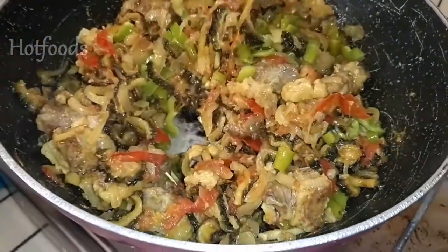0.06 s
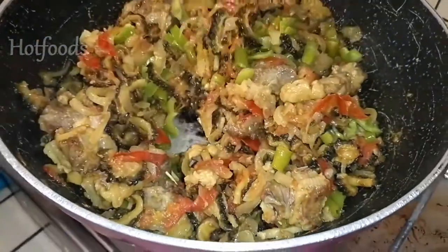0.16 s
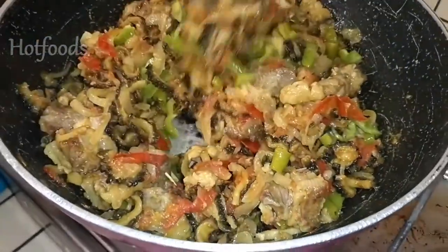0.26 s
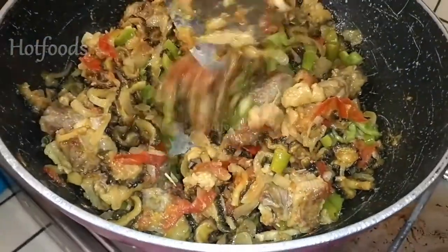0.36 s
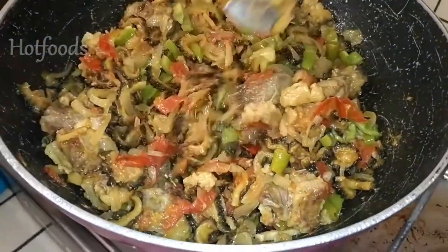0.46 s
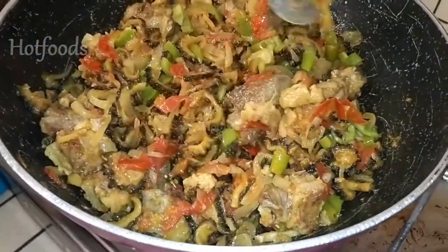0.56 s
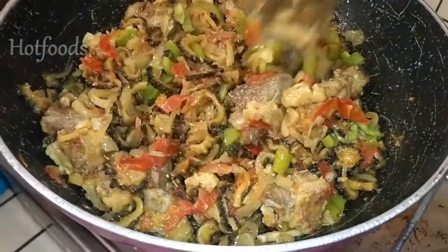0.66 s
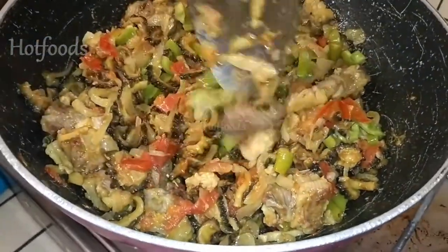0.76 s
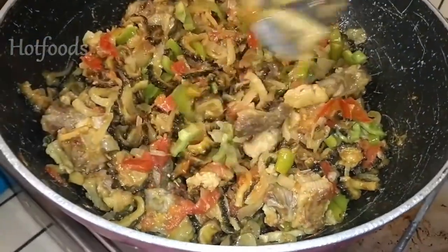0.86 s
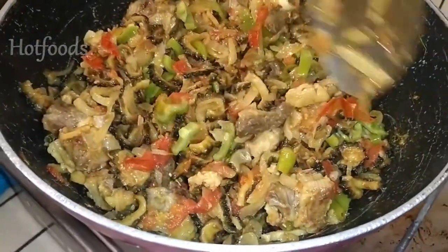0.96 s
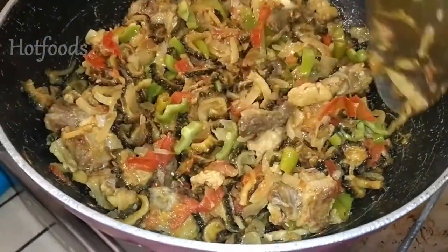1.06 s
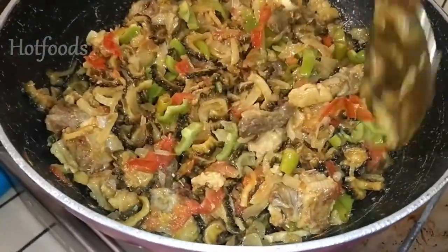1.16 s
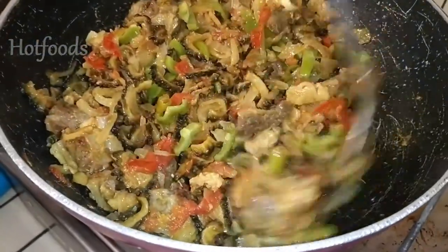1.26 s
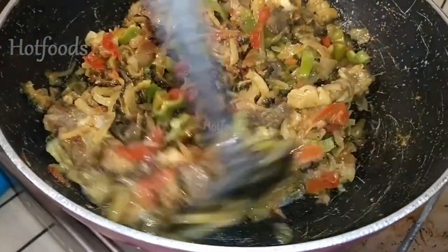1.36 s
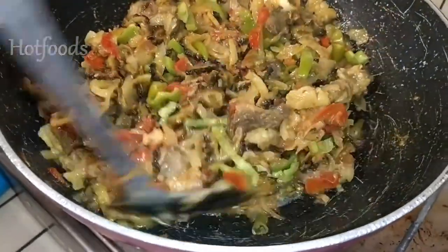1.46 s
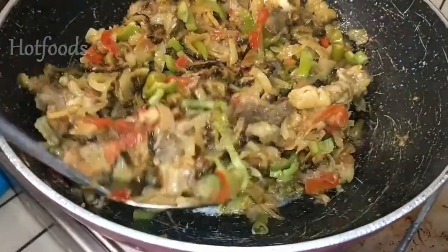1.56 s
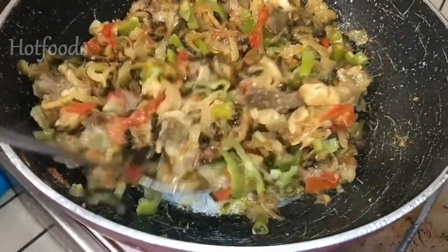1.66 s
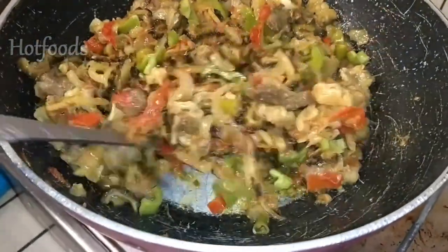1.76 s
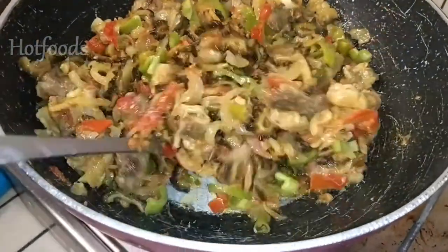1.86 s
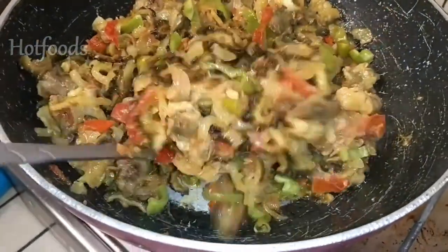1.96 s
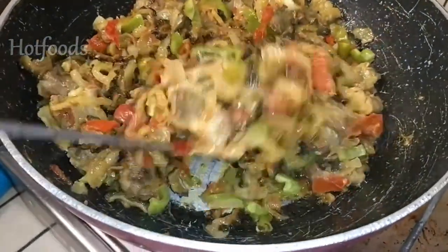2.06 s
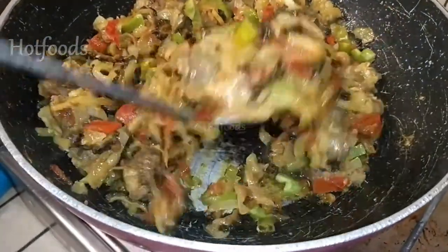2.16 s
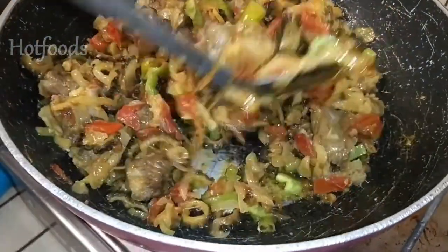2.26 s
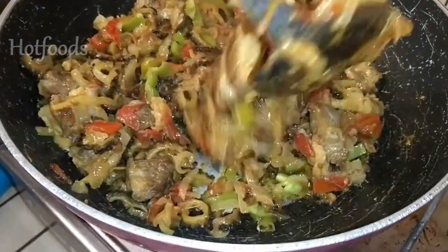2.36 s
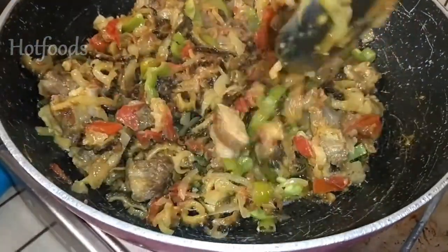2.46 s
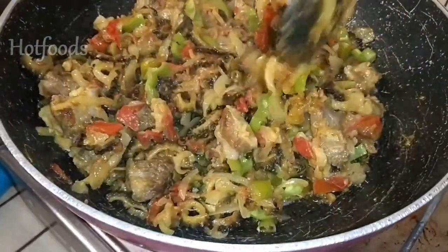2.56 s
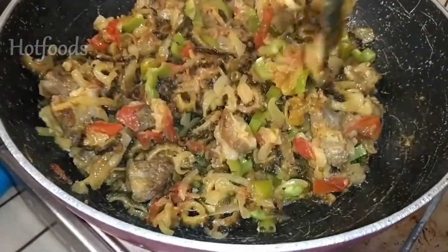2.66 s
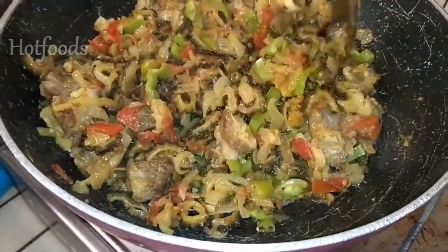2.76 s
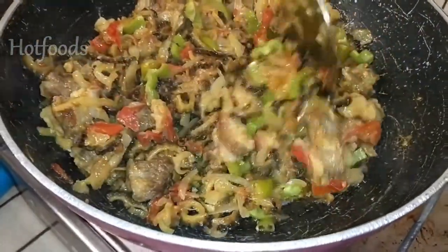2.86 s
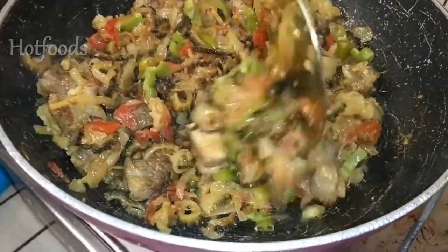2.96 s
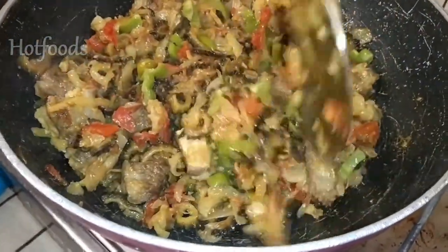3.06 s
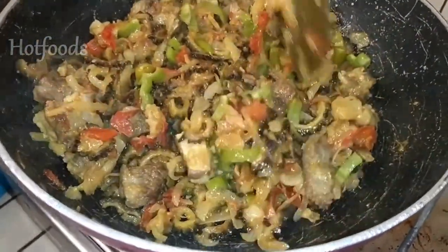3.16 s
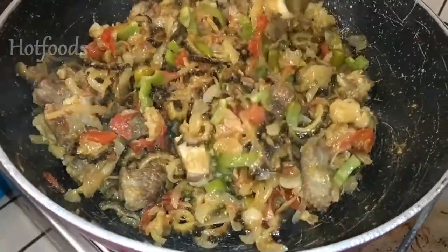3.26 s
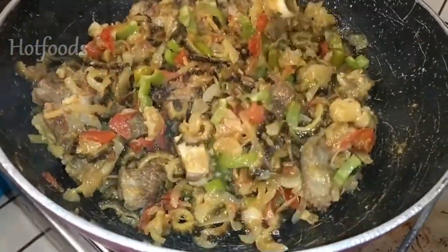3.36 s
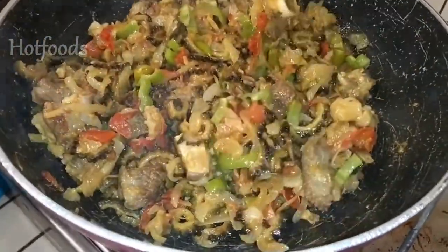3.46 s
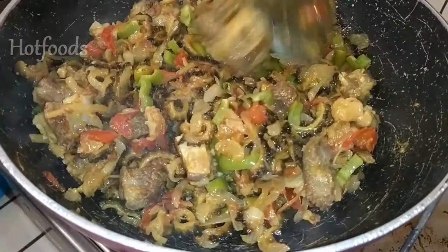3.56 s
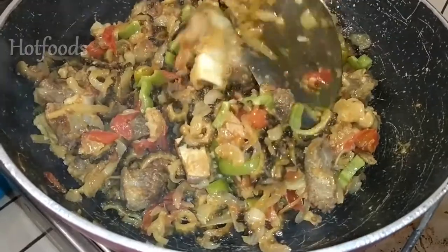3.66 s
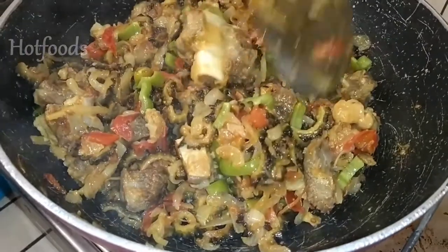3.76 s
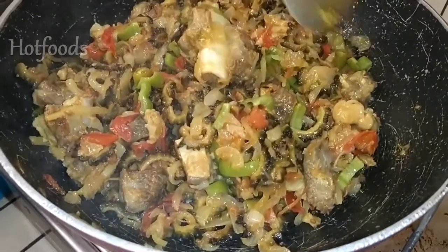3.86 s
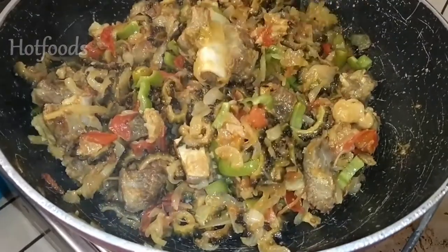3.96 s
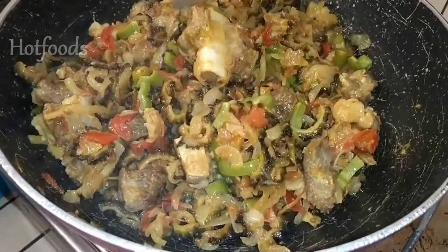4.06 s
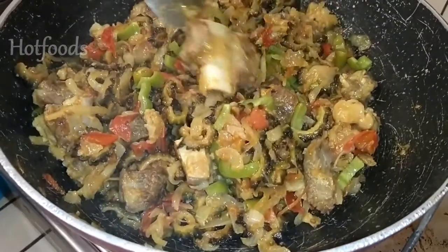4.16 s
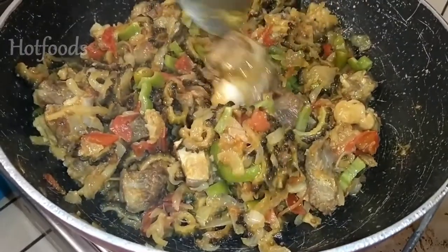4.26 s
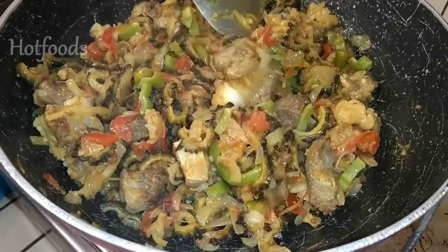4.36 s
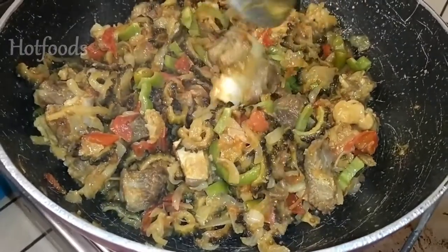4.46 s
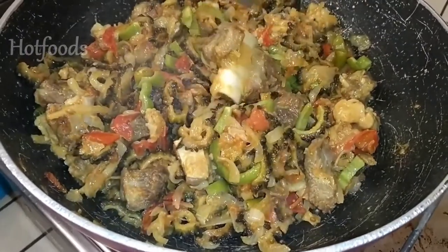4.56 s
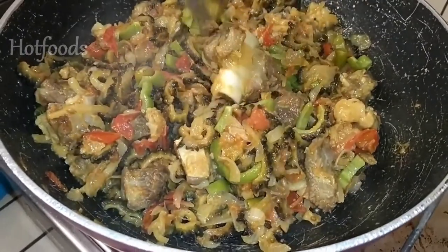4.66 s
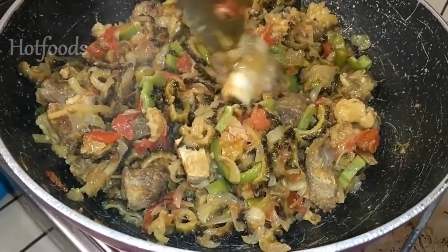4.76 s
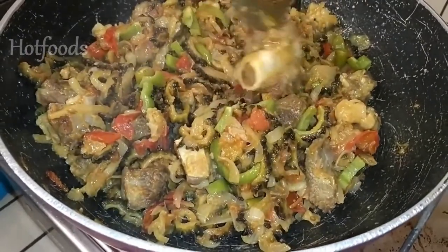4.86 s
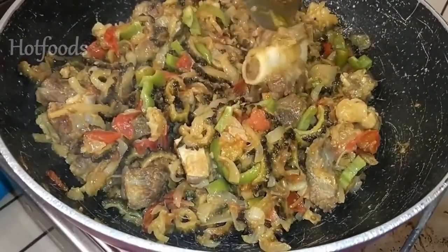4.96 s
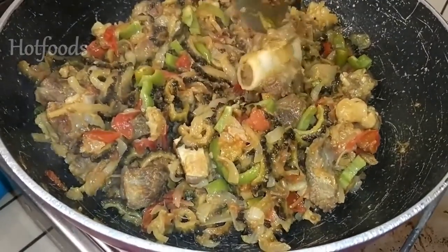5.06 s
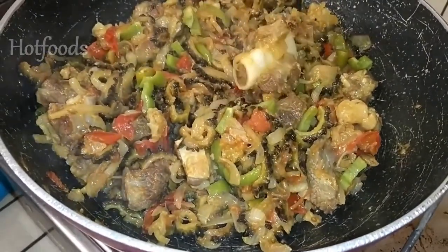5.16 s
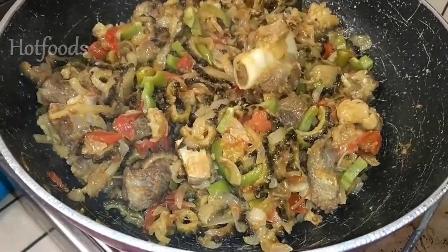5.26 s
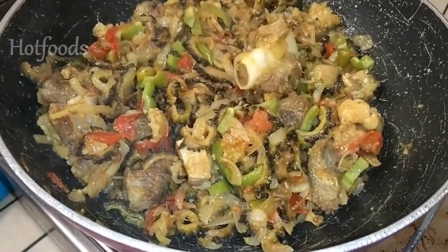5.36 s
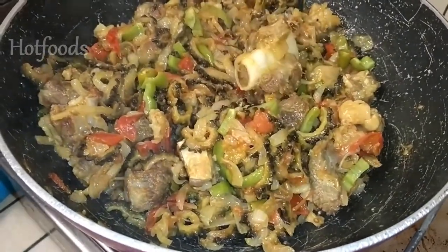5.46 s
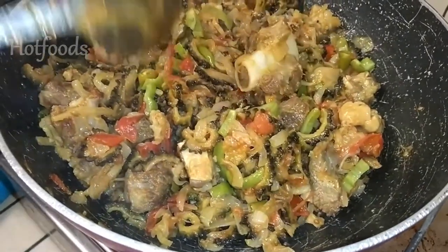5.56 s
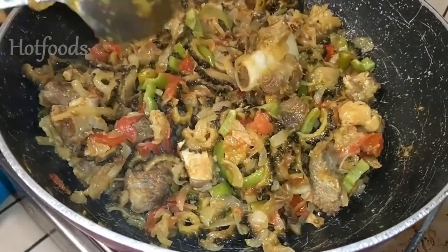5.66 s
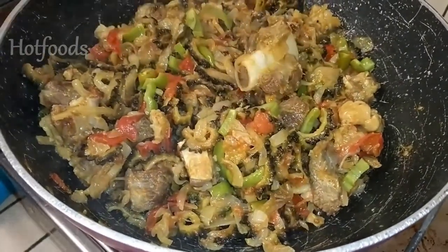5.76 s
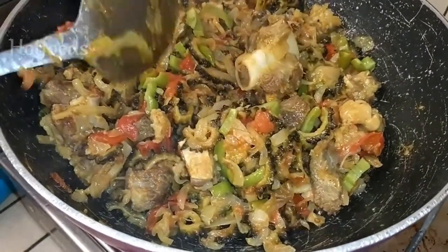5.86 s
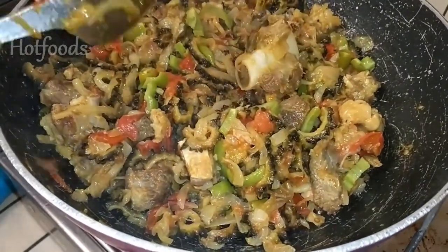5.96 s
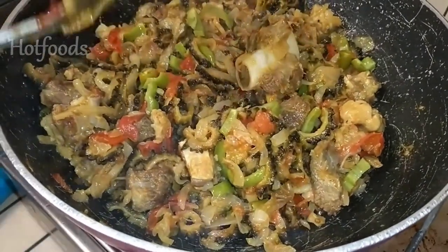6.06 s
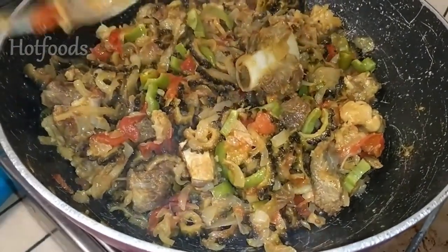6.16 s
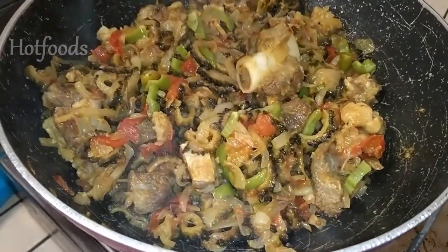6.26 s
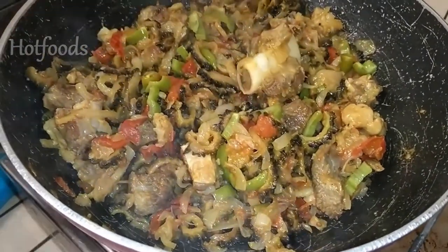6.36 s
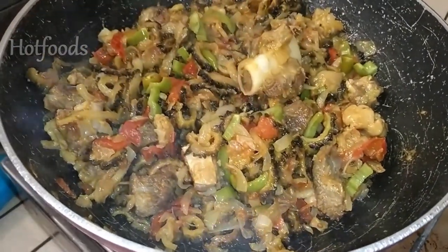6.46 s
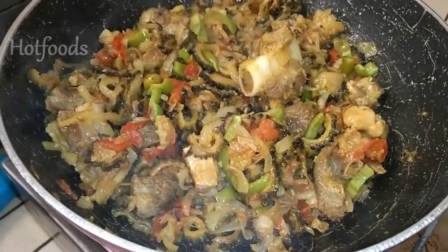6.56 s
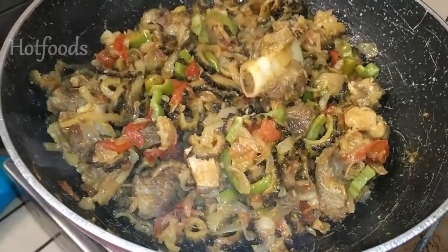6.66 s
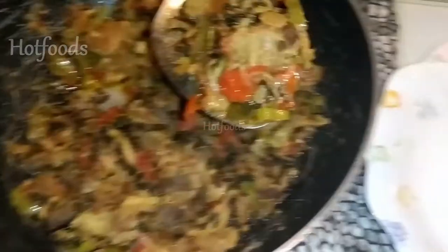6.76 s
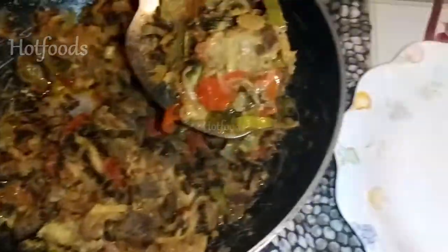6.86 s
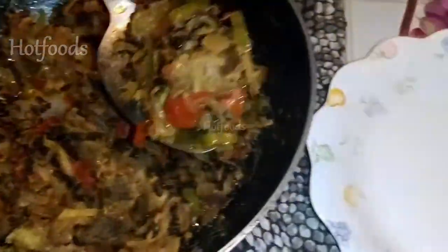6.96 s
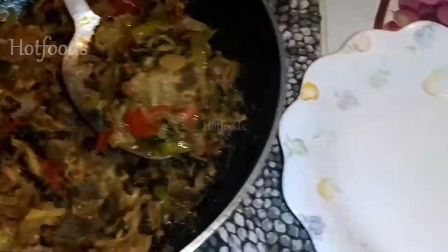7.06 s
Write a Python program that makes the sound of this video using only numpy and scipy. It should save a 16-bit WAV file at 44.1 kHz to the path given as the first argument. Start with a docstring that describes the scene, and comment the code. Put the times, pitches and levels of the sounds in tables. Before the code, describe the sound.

Close, wide stereo frying in a hard-walled kitchen: dense bright sizzle with oil spits over low rumble and faint fan hum. Early on, a steel spoon knocks and scrapes the wok in quick strokes. Midway a metal lid clanks and rattles sharply. Later something heavy is shoved far off, dull and brief. The hiss slowly eases, then cuts suddenly to a quiet room with a tiny final tap.

```python
"""Frying in a wok, then a quiet table

Vegetables hiss, crackle and spit in a wok close to two spaced microphones: noise shaped by frequency and tiny bursts.
A steel spoon scrapes and knocks the wok: rough grains and single blows set its ringing tones going.
A metal lid clanks and rattles as decaying tones with cracks; a heavy shove far off is a swell of dull noise.
A fan hums as a wandering tone, and hard walls echo the blows. Near the end the sound cuts to the table,
with soft room noise, faint appliance tones and a last small knock of the spoon."""
import sys
import numpy as np
from scipy import signal
from scipy.fft import rfft, irfft, next_fast_len
from scipy.io import wavfile
from scipy.ndimage import uniform_filter1d, map_coordinates

SR = 44100
rng = np.random.default_rng(int(sys.argv[2]) if len(sys.argv) > 2 else 0)


def transcribe(u):
    """Save the signal u as a 16-bit wav file named by the first command-line argument.

    u: samples, shape (n,) or (channels, n), limited to [-1, 1]; the rate is SR.
    q: integer samples, one column per channel.
    """
    v = np.clip(np.atleast_2d(u).T, -1, 1)
    q = np.round(v * 32767).astype(np.int16)
    wavfile.write(sys.argv[1], SR, q)


def volts(x):
    """Linear amplitude factor 10**(x/20) for a level x in dB, scalar or array-like."""
    e = np.asarray(x, float) / 20
    return 10 ** e


N = 313992  # length in samples
CUT_S = 6.772  # the stove gives way to the table

# Colours of noise, only their shape counts: (frequency [Hz], relative level [dB])
SIZZLE_COLOUR = [(210, -37.5), (350, -11.5), (600, -18), (750, -10.5), (1300, -11), (1900, -9),
                 (3050, -6.5), (3500, -8), (4500, -5.5), (4900, -9), (6300, -4.5), (7000, -4), (8000, 1.5),
                 (9500, -4.5), (11900, -13), (12200, -16.5), (14000, -21.5), (15700, -19.5)]
RUMBLE_COLOUR = [(13, -37), (22, -11.5), (151, 0.5), (214, -1.5), (233, -4), (335, -4), (416, -16.5),
                 (480, -10), (700, -9.5), (910, -25.5), (1540, -120)]
RASP_COLOUR = [(880, -41.5), (1500, -17), (1850, -16), (2100, -16), (2300, -14.5), (4640, -9.5), (6120, -9),
               (8320, -2), (14600, -23.5), (16000, -30.5)]
CRACK_COLOUR = [(22, -45), (55, -28), (100, -21), (249, -16), (442, -28), (691, -17), (1250, -29.5),
                (1610, -20.5), (2470, -20.5), (2860, -23), (3540, -13.5), (6700, -13.5), (7770, -1),
                (16000, -26)]
SHOVE_COLOUR = [(29, -51), (50, -22), (118, -4), (222, -0.5), (353, -7), (543, -19), (634, -36), (700, -28),
                (910, -54), (1540, -120)]
TABLE_COLOUR = [(15, -40), (45, -13), (110, -18.5), (175, -13), (300, -18), (450, -26), (1100, -30.5),
                (1500, -31), (3000, -34.5), (4200, -36), (5800, -34), (10000, -40), (12000, -42),
                (12350, -51), (12450, -100)]
# How alike left and right are: (frequency [Hz], likeness [1 = same, 0 = unrelated])
ALIKE = [(60, 0.68), (180, 0.86), (550, 0.64), (1650, 0.0052), (4970, 0.023), (15000, -0.046)]
# How the two microphones differ: (frequency [Hz], left minus right [dB])
MIC_DIFFERENCE = [(60, 1), (130, -1.5), (290, -1), (640, -1.5), (1410, 2), (3100, 2), (6820, -4.5),
                  (15000, -3)]
# How long the kitchen echo takes to fall by 60 dB: (frequency [Hz], time [s])
KITCHEN_DECAY = [(150, 0.53), (600, 0.53), (3000, 0.66), (8000, 0.5), (14000, 0.45)]
# Hum of the fan: (frequency [Hz], level [dB])
FAN_TONES = [(209.9, -68)]
# Appliance tones at the table: (frequency [Hz], level [dB])
TABLE_TONES = [(244, -64.5), (1516, -80)]
# Average course of the low rumble: (time [s], level [dB])
RUMBLE_LEVEL = [(0.0, -61.5), (0.41, -57.5), (0.8, -61.5), (1.7, -56.5), (3.1, -60), (5.2, -59),
                (5.6, -57.5), (6.7, -59)]
# The lid lands and lands again: (time [s], strength [dB], ring tilt [dB per octave])
LANDINGS = [(3.6535, -6, -7), (3.673, -14, -2), (3.683, -18, -5)]
# Ringing tones of the lid: (frequency [Hz], level [dB], time to fall by 60 dB [s])
LID_MODES = [(3058, -22, .12), (3500, -17, .5), (3822, -18, .12), (4609, -14, .12), (5974, -14, .2),
             (6487, -16, .15), (7000, -14, .12), (7606, -6, .25), (7804, -7, .15), (7958, -5, .3),
             (8343, -6, .2), (8406, -7, .2), (8499, -4, .25), (9346, -6, .2), (9679, 0, .13),
             (10290, -9, .2), (11320, -17, .15), (11838, -15, .15)]
# Ringing tones of the wok: (frequency [Hz], width [Hz], level [dB])
WOK_MODES = [(210, 23, -12), (387, 23, -6), (479, 18, 1.5), (707, 77, 0.5), (792, 66, 2), (970, 190, -6),
             (1149, 42, 6), (1465, 99, 1), (1610, 150, -5.5), (2074, 77, -5)]
# Ringing tones of the spoon bowl: (frequency [Hz], width [Hz], level [dB])
BOWL_MODES = [(2800, 250, 0), (3550, 300, 0), (4050, 300, -2), (4660, 250, -3)]
# Spoon pushed over the wok:
# (time of most pressure [s], build-up [s], rasp [dB], wok ring [dB], spoon ring [dB])
PUSHES = [(1.295, 0.045, -41.5, -47, -47), (1.425, 0.078, -29.5, -41.5, -63),
          (1.575, 0.035, -39.5, -46.5, -41.5), (1.705, 0.049, -32.5, -44.5, -68),
          (1.795, .07, -34, -40, -41), (1.862, .05, -38.5, -34, -42)]
# Spoon knocks: (time [s], click strength [dB], blow strength [dB], hardness [dB per octave])
KNOCKS = [(1.279, -19, 4.5, -7.5), (1.415, -43, -0.5, -5), (1.5628, -33.5, -5.5, -11.5),
          (1.7024, -29.5, 2.5, -4.5), (1.7374, -39, 4, -5), (1.8497, -34, -6, 4), (6.9092, -73, -23, -2.1)]
# Wet food meets hot metal: (time [s], rise [dB], settling time [s])
FLARES = [(0.0, 2.5, .35), (1.7, 2, .4), (3.9, 1, 1.0)]
# Loudest oil spits: (time [s], strength [dB])
LOUD_SPITS = [(0.034, -34.5), (0.1, -35.5), (0.117, -39.5), (0.137, -40.5), (0.2194, -40.5), (0.449, -39),
              (0.8896, -34.5), (0.9794, -38.5), (1.105, -39), (1.2585, -36), (4.0492, -43), (4.3994, -41),
              (6.0694, -40), (6.2692, -40)]


def unit(x):
    """Scales a sound to an average (rms) level of 1."""
    return x / np.sqrt(np.mean(x ** 2) + 1e-20)


def along(points, hz):
    """Reads a value between (frequency, value) points, on a log frequency axis."""
    f, value = np.transpose(points)
    return np.interp(np.log(hz + 1), np.log(f + 1), value)


def curves(rows):
    """Gives one value per sample for each column after the time."""
    s, *columns = np.transpose(rows)
    return [np.interp(np.arange(N) / SR, s, column) for column in columns]


def wobble(rate):
    """Draws a smooth random curve through `rate` random points a second."""
    points = rng.standard_normal(int(N * rate / SR) + 4)
    return map_coordinates(points, [np.arange(N) * rate / SR])


def filtered(x, response):
    """Multiplies each frequency of x by response(frequency)."""
    m = next_fast_len(N + SR // 2)
    return irfft(rfft(x, m) * response(np.fft.rfftfreq(m, 1 / SR)), m)[..., :N]


def coloured(x, colour):
    """Gives x this colour with a filter of energy 1 that never acts ahead of time."""
    gain = volts(along(colour, np.fft.rfftfreq(4096, 1 / SR)))
    cepstrum = irfft(np.log(gain + 1e-6))
    cepstrum[1:2048] *= 2  # folded forward, so a burst keeps its sharp start
    kernel = irfft(np.exp(rfft(cepstrum[:2049], 4096)))
    return signal.fftconvolve(x, kernel[None] / np.linalg.norm(kernel), axes=1)[:, :N]


def diffuse(colour, patchy_db):
    """Makes wide stereo noise of rms 1, alike in the bass, with random louder and softer patches."""
    z = signal.stft(rng.standard_normal((2, N)), nperseg=512)[2]
    patches = uniform_filter1d(rng.standard_normal(z.shape[1:]), 6, 0)
    patches = unit(uniform_filter1d(patches, 10, 1))
    pair = signal.istft(z * volts(patchy_db * patches), nperseg=512)[1][:, :N]

    def middle_and_side(hz):
        angle = np.arccos(np.clip(along(ALIKE, hz), -1, 1)) / 2
        return volts(along(colour, hz)) * np.array([np.cos(angle), np.sin(angle)])

    mid, side = filtered(pair, middle_and_side)
    return unit(np.array([mid + side, mid - side]))


def bursts(seconds, db, life):
    """Makes an envelope of sudden bursts, each fading to about a third in `life` seconds."""
    starts = np.bincount((np.asarray(seconds) * SR).astype(int), volts(db), N)[:N]
    return signal.lfilter([1], [1, -np.exp(-1 / (max(life, 1e-4) * SR))], starts)


def grains(count, spread_db, life):
    """Makes stereo noise from tiny random bursts, many small and few large."""
    when, chance = rng.random((count, 2)).T
    size_db = -spread_db * np.log(.02 + chance)
    return bursts(when * N / SR, size_db, life) * rng.standard_normal((2, N))


def tones(lines, waver_db, drift):
    """Adds steady tones whose level and phase (drift in radians) wander."""
    t = np.arange(N) / SR
    total = 0
    for hz, db in lines:
        level = volts(db + 1.5 + waver_db * wobble(6.6))
        total = total + level * np.sin(2 * np.pi * hz * t + drift * wobble(12))
    return total


def resonate(force, modes):
    """Lets a force ring a body with damped modes; neighbouring modes alternate in sign."""
    def body(hz):
        total = 0
        for k, (centre, width, db) in enumerate(modes):
            damping = 1j * hz * width
            total = total + (-1) ** k * volts(db) * damping / (centre ** 2 - hz ** 2 + damping)
        return total

    return filtered(force, body)


def kitchen(x):
    """Hard walls answer after about 6 ms with dense echoes; each frequency dies at its own speed."""
    hz, t, z = signal.stft(rng.standard_normal((2, SR * 3 // 4)), SR, nperseg=256)
    t60 = np.maximum(along(KITCHEN_DECAY, hz), .05)[:, None]
    tail = signal.istft(z * volts(-60 * t / t60), SR, nperseg=256)[1]
    late = np.pad(x, ((0, 0), (260, 0)))
    return signal.fftconvolve(late, tail / np.linalg.norm(tail[0]), axes=1)[:, :N]


def table():
    """A quiet room: soft shaped noise that wavers a little, and faint appliance tones."""
    air = volts(-64 + 0.62 * wobble(11)) * diffuse(TABLE_COLOUR, patchy_db=1.5)
    return air + tones(TABLE_TONES, waver_db=2.5, drift=0.14)


def fan():
    """The fan hums: a low tone with wandering level and phase."""
    return tones(FAN_TONES, waver_db=2.0, drift=0.42)


def rumble():
    """A low rumble swells and sinks: noise with most of its strength in the bass."""
    level_db = curves(RUMBLE_LEVEL)[0] + 0.69 * wobble(7)
    return volts(level_db) * diffuse(RUMBLE_COLOUR, patchy_db=1.26)


def shove():
    """Something heavy is shoved far off: dull noise, the same on both sides, rises, holds and dies."""
    start_s, rise_s, hold_s, t60_s, level_db = 5.358, .02, .09, .3, -49.5
    t = np.arange(N) / SR - start_s
    rise = np.clip(t / rise_s, 0, 1)
    loss_db = 60 * np.maximum(t - rise_s - hold_s, 0) / t60_s
    shape = rise * volts(level_db - loss_db)
    return coloured(shape * rng.standard_normal((1, N)), SHOVE_COLOUR)


def lid():
    """Each contact cracks and rings the lid's modes anew; the lid rocks, so every mode flutters."""
    rattle_s, gap_s, rattle_db = 3.659, .009, -17.5
    hold_s, loss_db_per_s = 0.025, 380.5  # the rattle holds its strength, then weakens fast
    ring_db = -14.5  # ring compared with contact strength
    out, t = np.zeros((2, N + SR)), np.arange(SR * 6 // 10) / SR
    hz, level, t60 = np.transpose(LID_MODES)[:, :, None, None]
    flutter_db = 3.5 * np.array([[wobble(60)[:len(t)]] for _ in LID_MODES])

    after = gap_s * (np.arange(7) + rng.uniform(0, .4, size=7))
    chatter_db = rattle_db - loss_db_per_s * np.maximum(after - hold_s, 0)
    contacts = LANDINGS + [(rattle_s + s, db, 1.5) for s, db in zip(after, chatter_db)]
    for s, db, tilt_db in contacts:
        chance_db, chance_phase = rng.standard_normal((2, len(LID_MODES), 2, 1))
        mode_db = level + tilt_db * np.log2(hz / 7000) + 1.5 * chance_db + flutter_db
        gain = volts(mode_db - 60 * t / t60)
        ring = np.sum(gain * np.sin(2 * np.pi * hz * t + 3 * chance_phase), axis=0)
        onset = 1 - np.exp(-t / .001)
        out[:, round(s * SR):][:, :len(t)] += volts(db + ring_db) * ring * onset

    s, db, _ = np.transpose(contacts)
    crack = uniform_filter1d(bursts(s, db, life=.0035), size=70, origin=34)  # a contact takes a moment to build
    return out[:, :N] + coloured(crack * rng.standard_normal((2, N)), CRACK_COLOUR)


def scrapes():
    """The spoon's edge catches on the rough coating in quick grains that rasp and ring both metals."""
    build_db, release_ratio, deep_db = 12.5, .75, -22  # pressure gain; release over build-up; deep ring under rasp
    t = np.arange(N) / SR
    catches = grains(count=20000, spread_db=2.0, life=.001)
    rasp = unit(coloured(catches, RASP_COLOUR))
    deep = unit(resonate(catches, [mode for mode in WOK_MODES if mode[0] <= 600]))
    high = unit(resonate(catches, [mode for mode in WOK_MODES if mode[0] > 600]))
    bowl = unit(resonate(catches, BOWL_MODES))
    out = 0
    for s, build, rasp_db, ring_db, bowl_db in PUSHES:
        distance = np.maximum((s - t) / build, (t - s) / (build * release_ratio))
        pressure = volts(-build_db * distance)
        rough = volts(rasp_db) * (rasp + volts(deep_db) * deep)
        out = out + pressure * (rough + volts(ring_db) * high + volts(bowl_db) * bowl)
    return out


def knocks():
    """The spoon strikes the wok: short noisy clicks, each with a blow that rings the metal."""
    s, db, _, _ = np.transpose(KNOCKS)
    clicks = uniform_filter1d(bursts(s, db, life=0.0095), size=30, origin=14)  # softens each start
    out = coloured(clicks * rng.standard_normal((2, N)), RASP_COLOUR)
    for s, _, blow_db, tilt_db in KNOCKS:
        # a soft blow favours low modes
        struck = [(hz, width, db + tilt_db * np.log2(hz / 700)) for hz, width, db in WOK_MODES]
        blow = np.arange(N) == round(s * SR)
        out = out + volts(blow_db) * resonate(blow, struck)
    return out


def sizzle():
    """Steam bubbles burst in the oil: a dense hiss with tiny pops, fading slowly as the food dries."""
    start_db, fade_db_per_s = -42, 0.2338  # before flares and wobble
    t = np.arange(N) / SR
    level_db = start_db - fade_db_per_s * t
    for s, rise_db, settle in FLARES:
        level_db = level_db + rise_db * (t >= s) * np.exp(-abs(t - s) / settle)
    crackle = unit(coloured(grains(count=9000, spread_db=3.5, life=0.00043), SIZZLE_COLOUR))
    hiss = unit(diffuse(SIZZLE_COLOUR, patchy_db=1.43) + volts(-7.5) * crackle)
    return volts(level_db + 0.53 * wobble(7.8) + 0.47 * wobble(30)) * hiss


def spits():
    """Oil spits: loud ones at set times and weak ones at random, each a brief burst of noise."""
    weakest_db = -48.5
    small = [(CUT_S * when, weakest_db + 5 * size) for when, size in rng.random(size=(24, 2))]
    s, db = np.transpose(LOUD_SPITS + small)
    return coloured(bursts(s, db, life=0.0068) * rng.standard_normal((2, N)), SIZZLE_COLOUR)


def scene():
    """The stove up to the cut, then the table; the spoon is heard in both."""
    stove = np.clip((CUT_S - np.arange(N) / SR) / .004, 0, 1)  # a 4 ms crossfade
    metal, steel, far = lid(), scrapes() + knocks(), shove()
    echo = kitchen(volts(-3.5) * metal + volts(-4.0) * steel + volts(-7.5) * far)
    frying = sizzle() + spits() + rumble() + fan()
    return stove * frying + (1 - stove) * table() + metal + steel + far + echo


def roll_off(x):
    """The treble ends steeply here."""
    return signal.sosfilt(signal.butter(12, 16820, fs=SR, output="sos"), x)


def record(dry):
    """The two microphones differ in colour, and nothing passes from 15760 Hz up."""
    def microphones(hz):
        half_each = np.array([[.5], [-.5]])
        return (hz < 15760) * volts(along(MIC_DIFFERENCE, hz) * half_each)

    mix = filtered(dry, microphones)
    return roll_off(mix)


dry = scene()
out = record(dry)
transcribe(out)
```